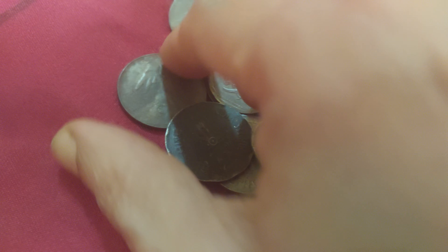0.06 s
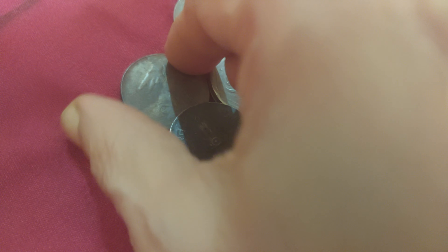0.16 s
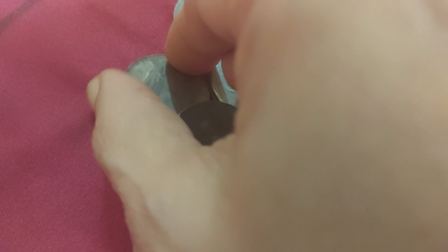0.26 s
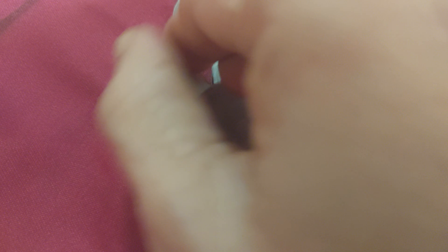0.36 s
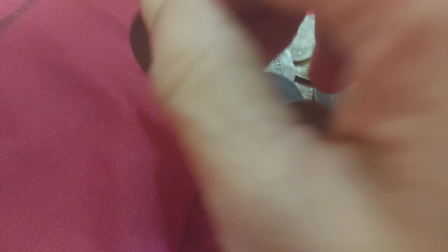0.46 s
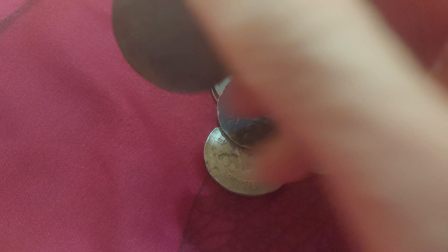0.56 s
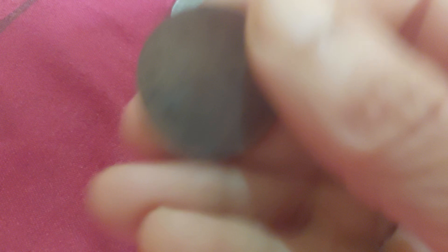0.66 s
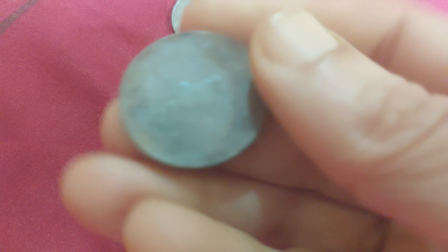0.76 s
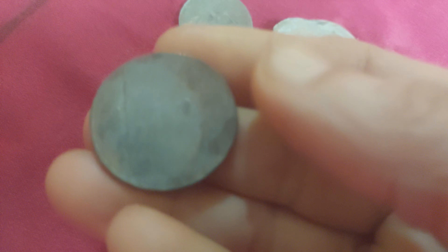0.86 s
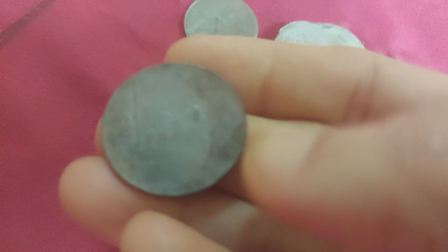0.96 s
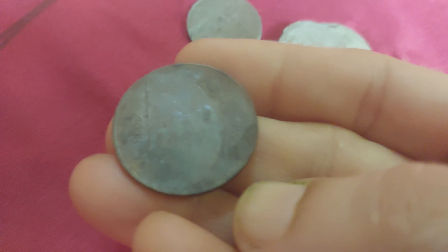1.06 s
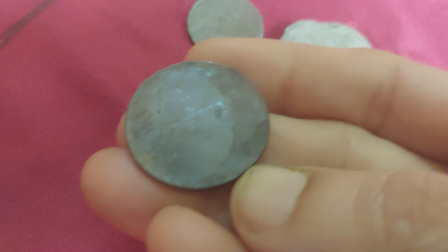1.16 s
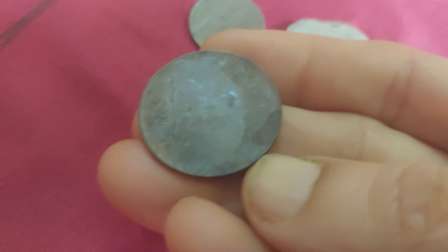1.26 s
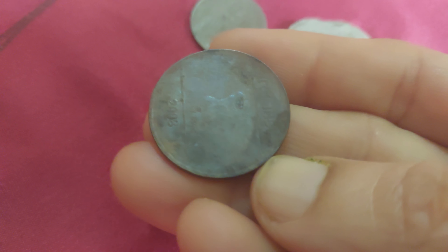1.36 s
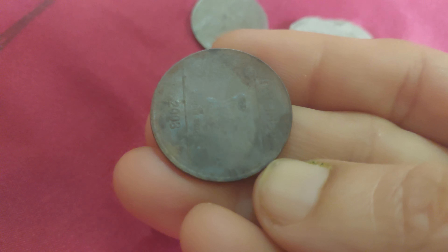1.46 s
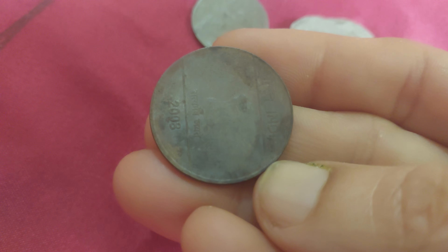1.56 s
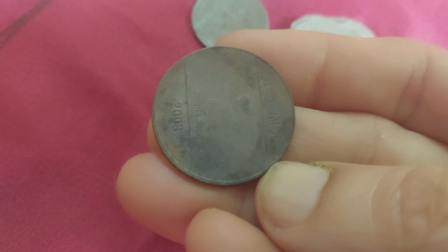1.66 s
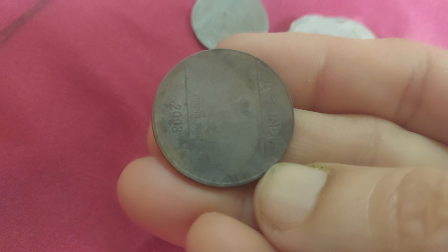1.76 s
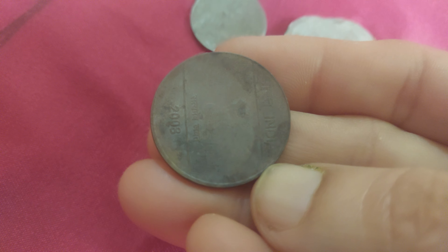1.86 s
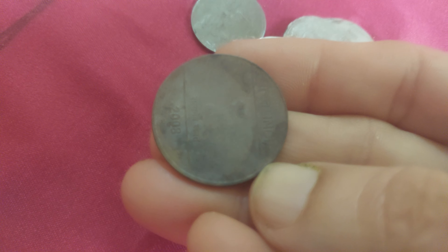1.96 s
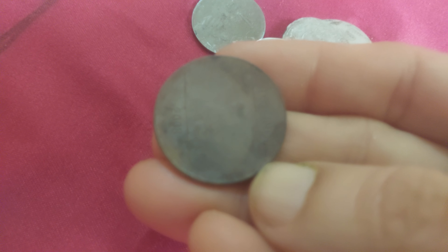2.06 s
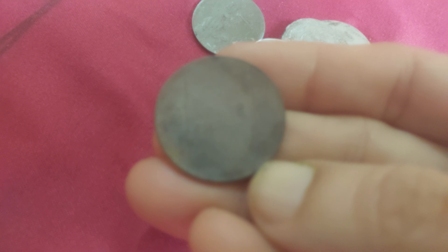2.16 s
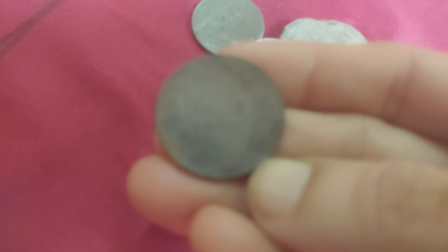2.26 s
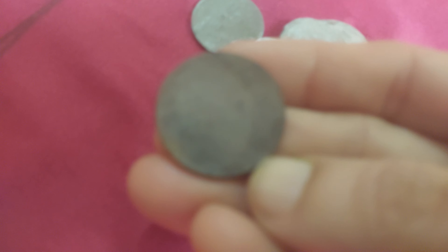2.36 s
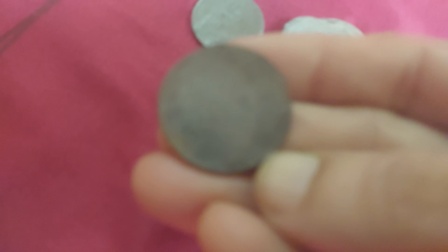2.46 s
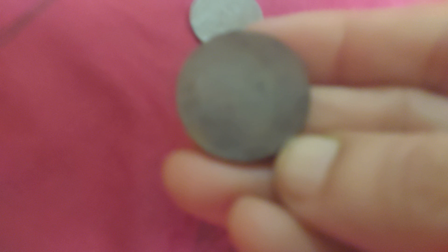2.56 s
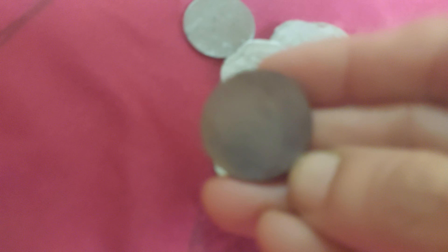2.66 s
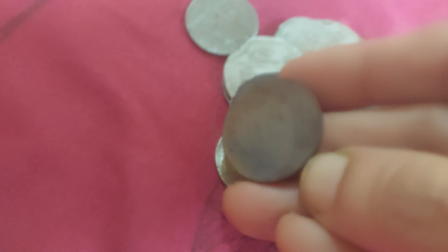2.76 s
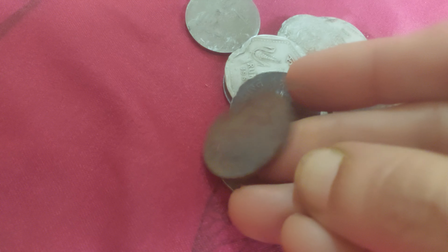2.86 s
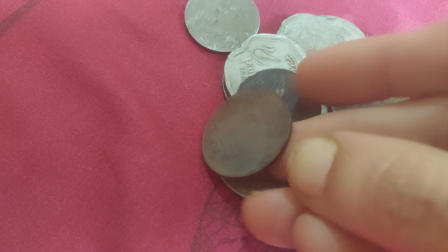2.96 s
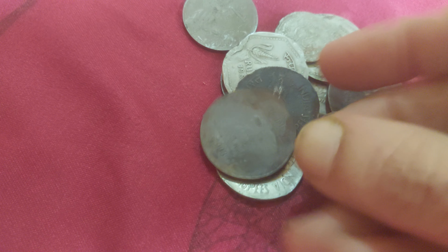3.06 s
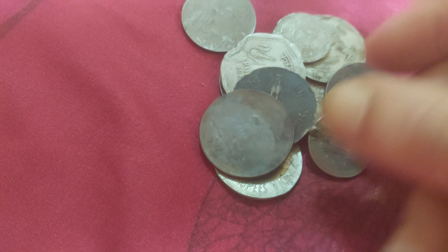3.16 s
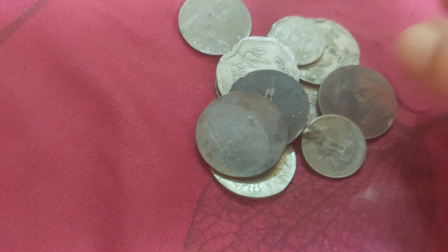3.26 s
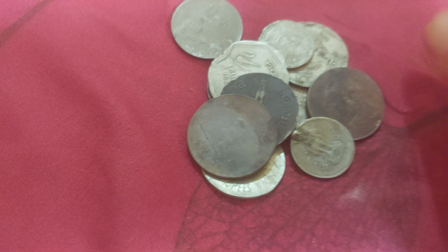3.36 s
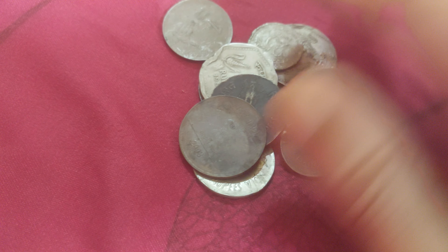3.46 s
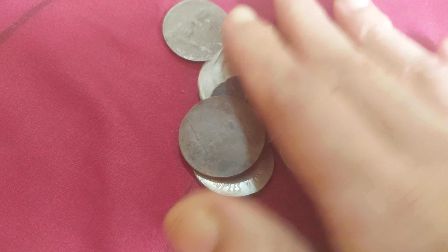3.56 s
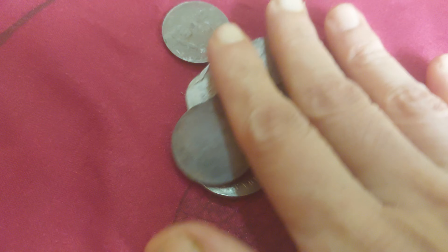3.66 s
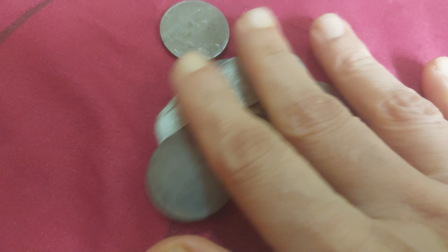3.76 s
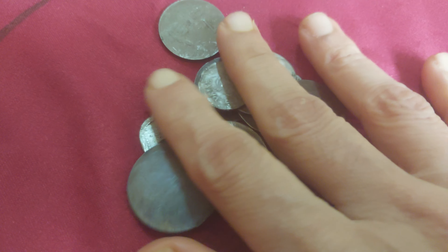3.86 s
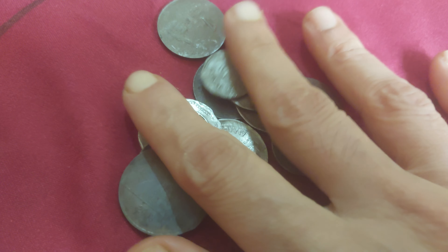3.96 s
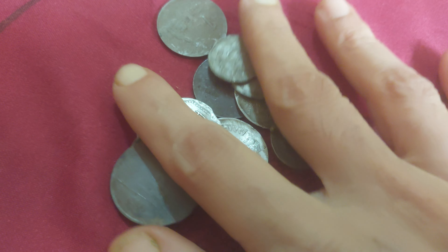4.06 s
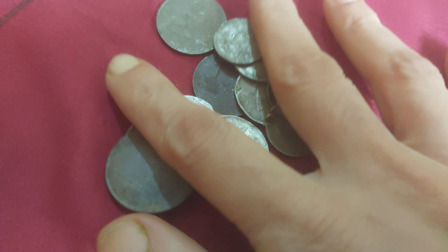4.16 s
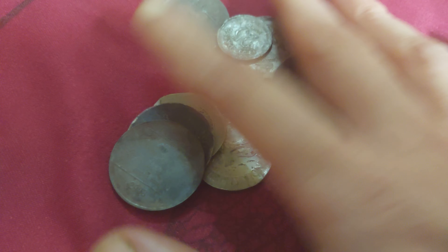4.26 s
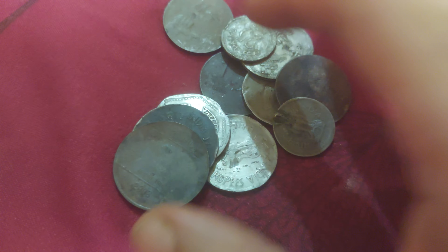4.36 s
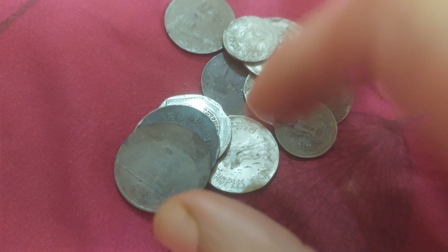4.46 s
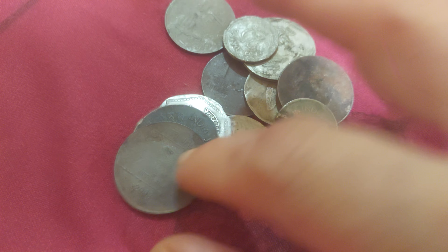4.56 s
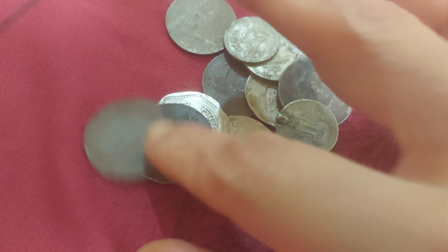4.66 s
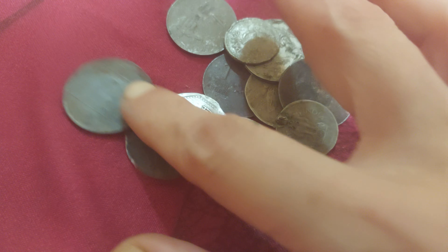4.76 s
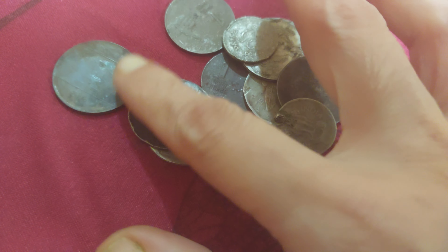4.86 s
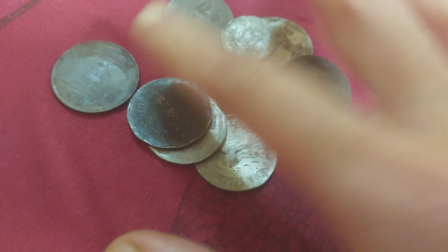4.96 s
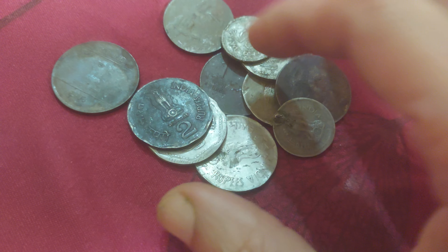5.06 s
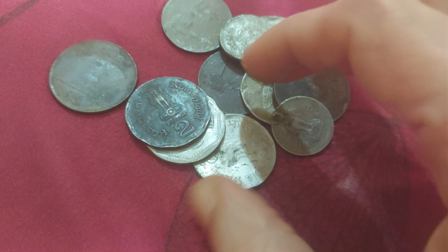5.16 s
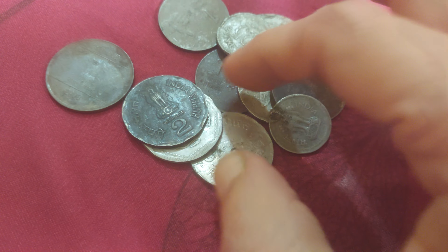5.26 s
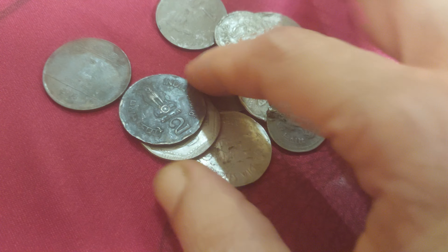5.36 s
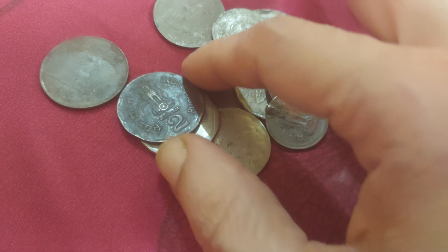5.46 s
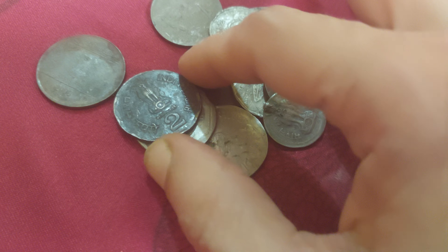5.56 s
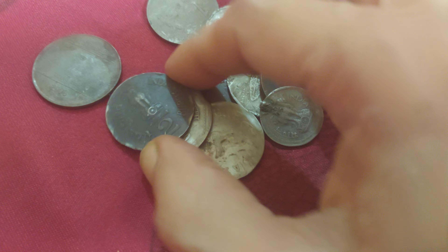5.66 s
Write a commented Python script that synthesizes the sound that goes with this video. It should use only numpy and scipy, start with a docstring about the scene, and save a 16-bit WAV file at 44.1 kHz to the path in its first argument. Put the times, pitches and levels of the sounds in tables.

```python
"""Fingers lift, drop and shuffle metal coins on a cloth, close to the left port of a small camera.
At 0.4 s a wide coin clicks and rings on the pile and the hand bumps the table. In the lull a low hum
and far rumble swell, with faint chirps. At 2.9 s a small coin rings; from 3 s another is stacked on top,
with two more bumps, and coins slide over each other and the weave. At 4.9 s one is pushed aside."""
import sys
import numpy as np
from scipy import signal
from scipy.fft import rfft, irfft, next_fast_len
from scipy.io import wavfile
from scipy.ndimage import map_coordinates

SR = 44100
rng = np.random.default_rng(int(sys.argv[2]) if len(sys.argv) > 2 else 0)


def inscribe(sig):
    """Save sig as 16-bit PCM at rate SR to the path in sys.argv[1].

    A 1-D sig is mono; a 2-D sig holds one channel per row.
    Samples are clipped to [-1, 1] before scaling.
    """
    pcm = np.round(np.clip(np.atleast_2d(sig).T, -1, 1) * 32767)
    wavfile.write(sys.argv[1], SR, pcm.astype(np.int16))


N = 251811

# Coin-on-coin contacts. Each row: start in seconds, tick level in dB, contact time in ms, ring level in dB.
CONTACTS = [(0.4086, -32, 0.43, -63), (0.443, -47.5, 1.6, -46.5), (0.4909, -37, 3.1, -37),
            (0.5031, -31.5, 1.36, -31), (0.5062, -30.5, 1.17, -15), (0.5151, -35, 1.5, -15.5),
            (0.5227, -35, 2.4, -16.5), (0.538, -38.5, 7.6, -24), (0.5736, -24, 0.56, -25),
            (2.8937, -26, 0.78, -48), (2.8994, -30, 0.68, -42), (2.909, -24.5, 0.45, -42),
            (2.9146, -35, 0.36, -51), (2.925, -35, 0.68, -55), (2.9643, -26, 0.45, -59.5),
            (3.0987, -28.5, 1.14, -33), (3.1154, -22.5, 2.14, -20), (3.1603, -33.5, 2.1, -42),
            (3.191, -31, 0.99, -44), (3.2159, -42, 0.89, -66), (3.2291, -37, 0.38, -50),
            (3.2388, -52, 0.55, -46), (3.2466, -53, 0.23, -57), (3.275, -51, 0.53, -52),
            (3.3105, -39, 1.1, -42.5), (3.3234, -41, 0.49, -53), (3.3825, -58, 0.47, -56.5),
            (3.6389, -41, 1.34, -59), (3.6742, -36.5, 0.79, -55.5), (3.7269, -45.5, 1.1, -41),
            (3.7918, -30, 0.57, -71.5), (3.81, -40.5, 1.95, -56), (3.8226, -32, 2.1, -58),
            (3.848, -33.5, 1.46, -56.5), (3.859, -23, 1.5, -49), (3.8654, -19, 2.25, -26),
            (3.88, -24, 1.2, -52.5), (4.2613, -42.5, 0.11, -74), (4.6244, -49, 0.76, -58),
            (4.6345, -38.5, 0.53, -42), (4.651, -44, 0.54, -70.5), (4.6785, -37, 0.78, -50),
            (4.723, -52, 0.93, -64), (4.7362, -28.5, 0.39, -41), (4.76, -38, 1.5, -75),
            (4.802, -37, 3.1, -69), (4.9, -33, 0.43, -32.5), (5.4055, -48, 0.8, -66)]
# Modes of four coins and the damped pile. Each row: frequency in Hz, level in dB, nominal t60 in seconds.
WIDE_COIN = [(7415, -8, .045), (7520, -5, .065), (7725, -6, .04), (12560, -5, .05), (12640, -2, .05),
             (12700, -19, .2), (13440, -12, .07)]
SMALL_COIN = [(9410, -6, .1), (10065, 0, .13), (15620, -8, .18)]
STACKED_COIN = [(7760, 0, .035), (9900, -12, .05), (12860, -10, .05), (15620, -12, .07)]
LONE_COIN = [(7430, 0, .03), (12820, -10, .22)]
PILE_MODES = np.array([(2700, -4, .008), (3500, 0, .009), (5200, 0, .007), (7900, -2, .005),
              (11300, 0, .004), (13500, -3, .004)])
# Tick colour. Each row: frequency in Hz, gain in dB.
TICK_EQ = [(100, -28), (1500, -18.5), (4000, -11.5), (7000, -4), (11000, -3.5), (16000, -9)]
# Times in seconds at which the small, the stacked and the lone coin take over the ringing.
HANDOVER_S = (2.8, 3.0, 4.85)
# Start and end in seconds of the span in which no hand presses the coins.
UNPRESSED_S = (1, 3.5)
KNOCK_DB, KNOCK_HZ = -20.5, 1210


def clinks():
    """Each contact chatters: a tick, the pile's clack, a knock into the table, the loose coin's ring."""
    ticks, rattling, clear, knocks = np.zeros((4, N + SR))
    t = np.arange(SR // 20) / SR
    for start_s, tick_db, contact_ms, ring_db in CONTACTS + rim_catches():
        at = round(start_s * SR)
        age = t / (np.clip(contact_ms, .2, 15) / 1000)
        force = age ** 1.583 * np.exp(.8 - age)
        chatter = unit_energy(force * rng.standard_normal(len(t)))
        coin = [WIDE_COIN, SMALL_COIN, STACKED_COIN, LONE_COIN][np.searchsorted(HANDOVER_S, start_s)]
        pressed = coin is STACKED_COIN and start_s > UNPRESSED_S[1]
        ring = coin_ring(coin, scatter_db=1.8, t60_scale=.6 if pressed else 1)
        # The pile lies differently at every contact, so its modes shift.
        shift = amp(rng.standard_normal(PILE_MODES.shape) * [1, 0, 1])
        pile = coin_ring(PILE_MODES * shift, scatter_db=3, t60_scale=.45)
        clack = signal.fftconvolve(chatter, unit_energy(pile))
        clack[:len(t)] += 1.6 * chatter
        strength = amp(tick_db) * np.linalg.norm(force)
        ticks[at:][:len(clack)] += strength * clack
        knocks[at:][:len(t)] += strength * chatter
        build_up = 1 - np.exp(-np.arange(len(ring)) / SR / (contact_ms / 1000))
        (clear if coin is SMALL_COIN else rattling)[at:][:len(ring)] += amp(ring_db) * ring * build_up
    knock = amp(KNOCK_DB) * filtered(knocks[:N], lambda hz: bandpass(hz, KNOCK_HZ))
    tick = filtered(thin_unpressed(ticks[:N]), lambda hz: amp(along(TICK_EQ, hz)))
    rattle = 1 + .9 * np.tanh(wobble(500))  # neighbours touch the ringing coin
    return rattle * rattling[:N] + clear[:N] + knock + tick


def coin_ring(modes, scatter_db, t60_scale):
    """One tap excites decaying modes at random phases, their levels spread by scatter_db."""
    t = np.arange(round(SR * t60_scale * max(t60 for hz, db, t60 in modes)) * 2) / SR
    return sum(amp(db + scatter_db * rng.standard_normal() - 60 * t / (t60_scale * t60))
               * np.sin(2 * np.pi * (hz * t + rng.random())) for hz, db, t60 in modes)


def thin_unpressed(x, corner_hz=3960):
    """Coins that no hand presses lose their lower clack."""
    t = np.arange(N) / SR
    thin = filtered(x, lambda hz: (1j * hz / (corner_hz + 1j * hz)) ** 2)
    return np.where((t > UNPRESSED_S[0]) & (t < UNPRESSED_S[1]), thin, x)


def rim_catches(rate_per_s=90, contact_ms=.33, threshold_db=-59.5):
    """Rims catch at random under hard strokes; returns rows as in CONTACTS."""
    when, chance = rng.random((round(rate_per_s * N / SR), 2)).T
    level_db = stroke_level_db()[(when * N).astype(int)]
    tick_db = level_db + 6.5 + 10 * np.log10(1 - chance)
    hard = level_db > threshold_db
    return [(s, db, contact_ms, db - 10) for s, db in zip(when[hard] * N / SR, tick_db[hard])]


# Finger strokes. Each row: start, swell time and hold time in seconds, level in dB.
STROKES = [(-.1, 0.25, 0.18, -61.5), (0.415, 0.022, 0.097, -54), (1.975, 0.32, 0.572, -79.5),
           (2.885, 0.0076, 0.032, -61.5), (3.118, 0.026, 0.037, -52.5), (3.418, 0.33, 0.032, -64),
           (3.627, 0.015, 0.028, -56.5), (3.697, 0.063, 0.091, -51), (4.004, 0.13, 0.085, -67),
           (4.284, 0.06, 0.05, -68.5), (4.625, 0.053, 0.078, -56), (4.706, 0.051, 0.081, -57),
           (5.002, 0.023, 0.037, -67), (5.399, 0.036, 0.089, -70), (5.509, 0.16, 0.062, -68)]


def stroke_level_db(swell_db=33.5, fade_db_per_s=126.5):
    """Each stroke swells, holds and dies as the hand eases; their powers add."""
    t = np.arange(N) / SR
    power = 0
    for start_s, swell_s, hold_s, db in STROKES:
        onset_db = swell_db * np.clip(1 - (t - start_s) / swell_s, 0, None) ** 2
        fade_db = fade_db_per_s * np.clip(t - start_s - swell_s - hold_s, 0, None)
        power += amp(db - onset_db - fade_db) ** 2
    return 10 * np.log10(power + 1e-14)


# Skin on cloth. Each row: frequency in Hz, relative density in dB.
CLOTH_SPECTRUM = [(500, -38), (1300, -10), (2200, -2.5), (5000, -0.5), (12000, -7), (16500, -12)]


def sliding():
    """Light strokes swish on the weave; under hard ones rims catch on relief and rasp through the coins."""
    level_db = stroke_level_db()
    hardness = np.clip((level_db + 64) / 8, 0, 1)
    friction = rng.standard_normal(N) * amp(1.2 * wobble(40))
    swish = unit_rms(filtered(friction, lambda hz: amp(along(CLOTH_SPECTRUM, hz))))
    slips = unit_rms(rng.standard_normal(N) * amp(5 * wobble(350) + 3.5 * wobble(90)))
    pile = unit_energy(coin_ring(PILE_MODES, scatter_db=0, t60_scale=.55))
    wide = unit_energy(coin_ring(WIDE_COIN, scatter_db=0, t60_scale=.6))
    body = np.pad(pile, (0, len(wide) - len(pile))) + amp(-8) * wide
    rasp = signal.fftconvolve(hardness * amp(level_db + 1.5) * slips, body)[:N]
    rasp = filtered(rasp, lambda hz: hz ** 2 / (hz ** 2 + 1800 ** 2))  # the rasp carries no bass
    return amp(level_db) * (1 - hardness / 2) * swish + thin_unpressed(rasp)


# Hand on table. Each row: start in seconds, gain in dB.
BUMPS = [(0.499, -33.5), (3.114, -38), (3.861, -36)]


def table_bumps(push_s=.009, thud_s=.0043, thud_db=3.5, thud_hz=702):
    """The hand sends a soft low push through the table; the top answers with a dull thud."""
    pushes, thuds = np.zeros((2, N + SR))
    t = np.arange(SR // 4) / SR
    push = np.sin(3 * t / push_s) * t / push_s * np.exp(-t / push_s)
    thud_envelope = (t / thud_s) ** 2 * np.exp(-t / thud_s)
    for start_s, db in BUMPS:
        at = round(start_s * SR)
        pushes[at:][:len(t)] += amp(db) * push
        thuds[at:][:len(t)] += amp(db + thud_db) * thud_envelope * rng.standard_normal(len(t))
    return pushes[:N] + filtered(thuds[:N], lambda hz: bandpass(hz, thud_hz) ** 2)


# Room decay. Each row: frequency in Hz, t60 in seconds.
ROOM_DECAY = [(500, 0.63), (5000, 0.067), (15000, 0.19)]


def room(x, predelay_samples=130):
    """A diffuse stereo tail in which each frequency dies at its own speed."""
    hz, t, noise = signal.stft(rng.standard_normal((2, SR // 3)), SR, nperseg=256)
    tail = signal.istft(noise * amp(-60 * t / along(ROOM_DECAY, hz)[:, None]), SR, nperseg=256)[1]
    delayed = np.pad(x, (predelay_samples, 0))[None]
    return signal.fftconvolve(delayed, tail / np.linalg.norm(tail[0]), axes=1)[:, :N]


# Far swells. Each row: time in seconds, hum level in dB, rumble level in dB.
FAR_LEVELS = [(0.0, -57, -52.5), (0.41, -54.5, -52), (1.13, -60.5, -61.5), (1.53, -52.5, -59),
              (1.67, -65.5, -60.5), (1.91, -50, -57.5), (2.05, -45.5, -49.5), (2.29, -51.5, -47),
              (2.7, -59, -54.5), (2.97, -57, -55.5), (3.45, -66.5, -65), (3.75, -62, -56),
              (4.03, -63.5, -63), (4.33, -63, -62), (4.63, -57.5, -62), (4.8, -59, -55),
              (5.01, -67.5, -60.5), (5.34, -55.5, -60.5), (5.71, -67.5, -62)]
# Hum and rumble colours. Each row: frequency in Hz, relative density in dB.
HUM_SPECTRUM = [(20, -51), (50, -11.5), (73, 12), (95, -7.5), (130, -56)]
RUMBLE_SPECTRUM = [(15, -53), (30, -18.5), (110, -4.5), (142, 0), (195, -5), (400, -9.5), (1100, -33.5),
                   (2500, -44.5), (5000, -100)]


def hum_and_rumble():
    """A narrow low hum and a broad far rumble swell and waver together."""
    hum_db, rumble_db = curves(FAR_LEVELS)
    waver_db = 1.4 * wobble(6)
    hum = amp(hum_db + waver_db) * stereo_noise(HUM_SPECTRUM) * amp([[1.2], [-1.2]])
    rumble = amp(rumble_db + waver_db + wobble(12)) * stereo_noise(RUMBLE_SPECTRUM)
    return hum + rumble


# Far chirps and hoots. Each row: start and length in seconds, pitch in Hz, level in dB.
CHIRPS = [(.75, .3, 4200, -86), (1.33, .22, 10350, -84), (1.97, .18, 9300, -87), (1.61, .18, 4210, -78),
          (1.74, .62, 4320, -81), (2.3, .58, 3900, -81), (2.17, .15, 9750, -84), (.95, .6, 3700, -85),
          (1.62, .6, 3720, -85), (.08, .24, 1400, -72), (5.25, .55, 800, -76)]


def far_chirps():
    """Fuzzy tones that swell, flicker and fade; the longer ones waver more."""
    t = np.arange(N) / SR
    drift = np.cumsum(.05 * wobble(300)) / SR
    tones = np.zeros(N)
    for start_s, length_s, hz, db in CHIRPS:
        arch = np.sin(np.pi * np.clip((t - start_s) / length_s, 0, 1)) ** .5
        tones += amp(db + 2.5 * wobble(30)) * arch * np.sin(2 * np.pi * hz * (t + length_s * drift))
    return tones


# Steady hiss, with a faint whistling band near 3.9 kHz. Each row: frequency in Hz, relative density in dB.
HISS_SPECTRUM = [(500, -19.5), (900, -7.5), (2900, -14), (3900, -7.5), (5600, -18.5), (9500, -15.5),
                 (16500, -21)]


def steady_hiss(level_db=-78.5):
    """A steady hiss, with a faint whistling band near 3.9 kHz."""
    return amp(level_db) * stereo_noise(HISS_SPECTRUM)


# Background width. Each row: frequency in Hz, left-right correlation.
COHERENCE = [(25, .8), (70, .94), (250, .75), (600, .4), (16000, .1)]


def stereo_noise(spectrum):
    """Coloured noise of rms 1, near mono in the bass."""
    def response(hz):
        angle = np.arccos(np.clip(along(COHERENCE, hz), 0, 1)) / 2
        return amp(along(spectrum, hz)) * [np.cos(angle), np.sin(angle)]
    mid, side = filtered(rng.standard_normal((2, N)), response)
    return unit_rms(np.array([mid + side, mid - side]))


def amp(db):
    return 10 ** (np.asarray(db) / 20)


def unit_rms(x):
    return x / np.sqrt(np.mean(x ** 2) + 1e-20)


def unit_energy(x):
    return x / np.linalg.norm(x)


def along(points, hz):
    """Interpolates (Hz, value) points on a log axis."""
    knots_hz, values = np.transpose(points)
    return np.interp(np.log(hz + 1), np.log(knots_hz + 1), values)


def curves(rows):
    """One value per sample for each column after the time."""
    times_s, *columns = np.transpose(rows)
    return [np.interp(np.arange(N) / SR, times_s, column) for column in columns]


def wobble(knots_per_s):
    """A smooth random curve."""
    knots = rng.standard_normal(int(N * knots_per_s / SR) + 4)
    return map_coordinates(knots, [np.arange(N) * knots_per_s / SR])


def bandpass(hz, centre_hz):
    return 2j * hz * centre_hz / (centre_hz + 1j * hz) ** 2


def filtered(x, response):
    """Applies a frequency response given as a function of Hz."""
    size = next_fast_len(N + SR // 2)
    return irfft(rfft(x, size) * response(np.fft.rfftfreq(size, 1 / SR)), size)[..., :N]


# Coin position. Each row: time in seconds, left over right in dB.
BALANCE = [(0, 16), (3.3, 16.5), (3.65, 12), (3.9, 20), (4.65, 31), (4.9, 21.5)]
RIGHT_LAG_SAMPLES = 9


def scene():
    """Coins reach the left port louder and sooner; bumps, room and background join them."""
    coins = clinks() + sliding()
    ratio = amp(curves(BALANCE)[0])
    left = 2 * ratio / (1 + ratio) * coins
    right = 2 / (1 + ratio) * np.pad(coins, (RIGHT_LAG_SAMPLES, 0))[:N]
    near = np.array([left, right]) + amp([[2.5], [-2.5]]) * table_bumps()
    return near + amp(-7) * room(coins) + hum_and_rumble() + far_chirps() + steady_hiss()


def record(dry):
    """The camera keeps nothing above its band limit."""
    limit_hz = 16450
    return filtered(dry, lambda hz: np.clip((limit_hz - hz) / 500, 0, 1) ** 2)


dry = scene()
out = record(dry)
inscribe(out)
```